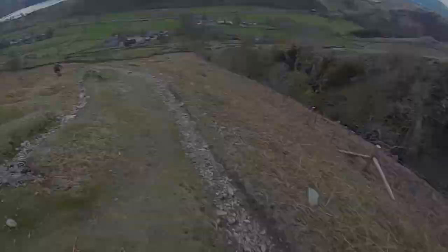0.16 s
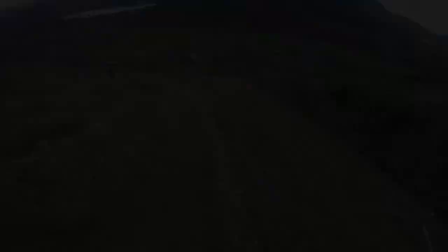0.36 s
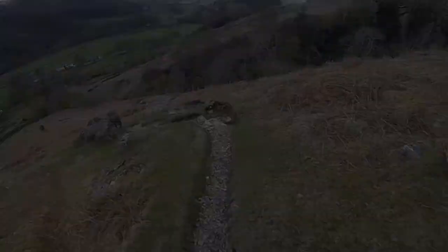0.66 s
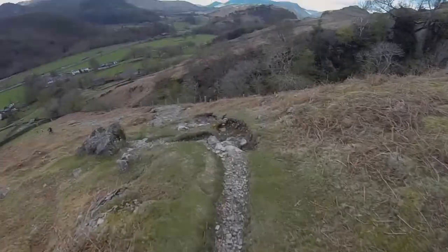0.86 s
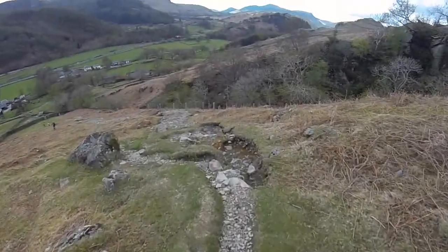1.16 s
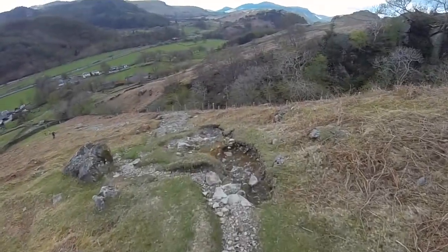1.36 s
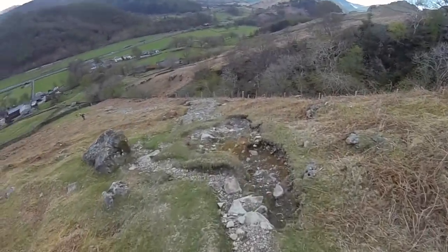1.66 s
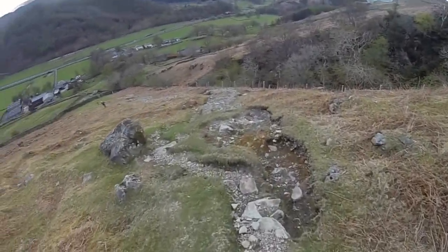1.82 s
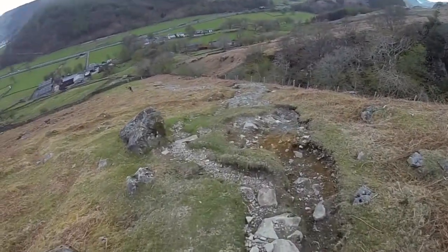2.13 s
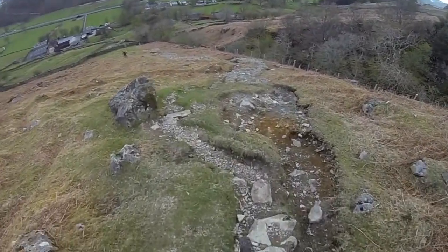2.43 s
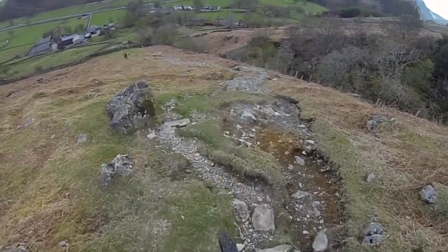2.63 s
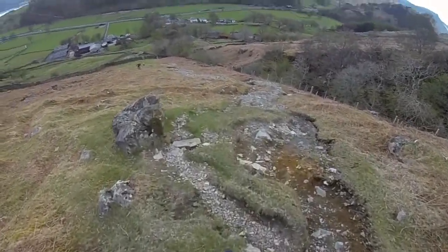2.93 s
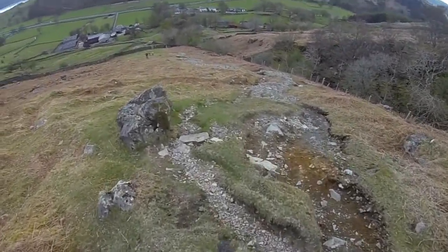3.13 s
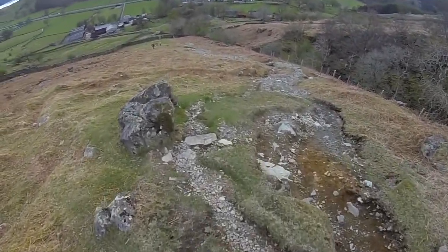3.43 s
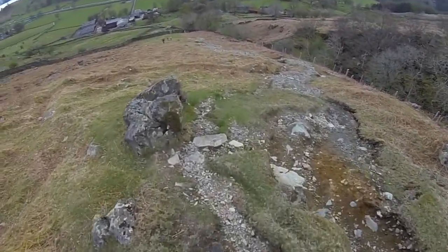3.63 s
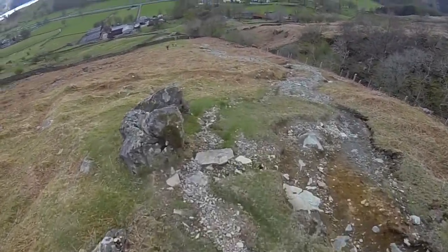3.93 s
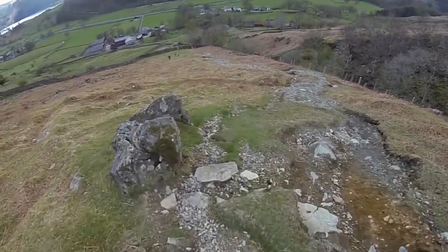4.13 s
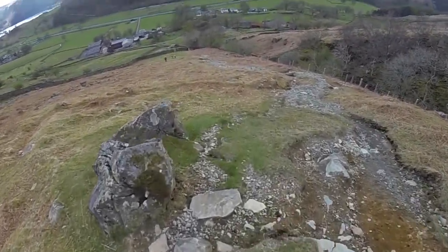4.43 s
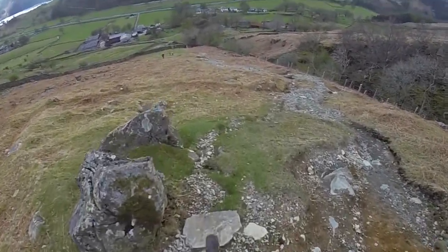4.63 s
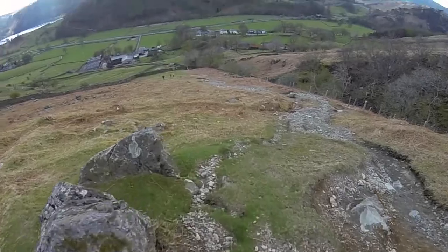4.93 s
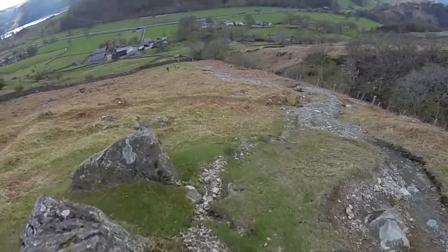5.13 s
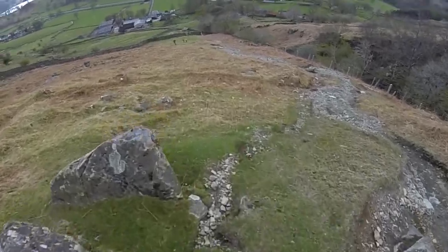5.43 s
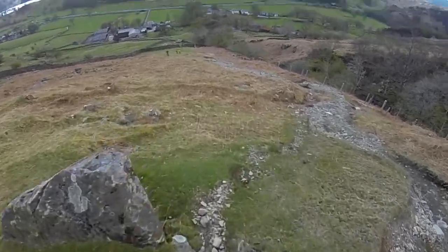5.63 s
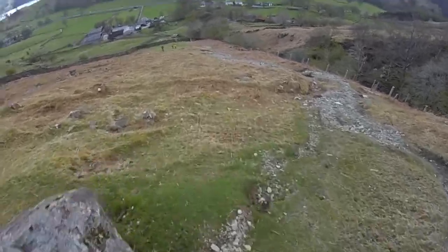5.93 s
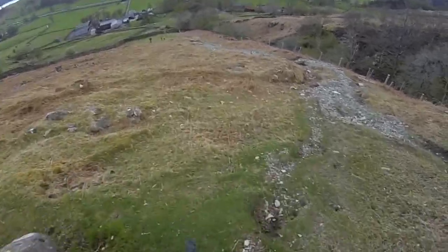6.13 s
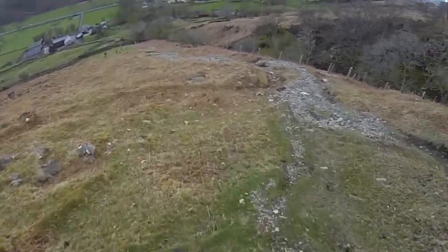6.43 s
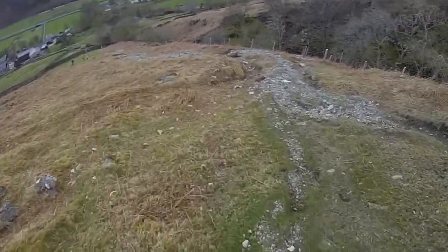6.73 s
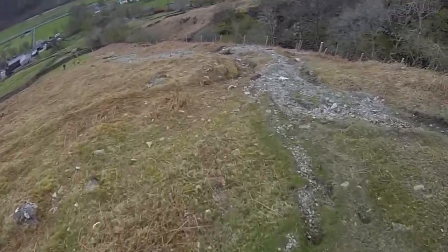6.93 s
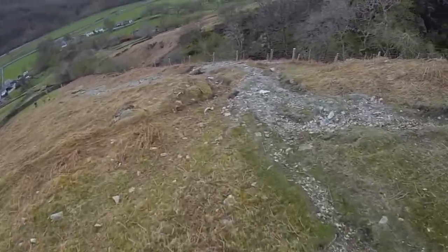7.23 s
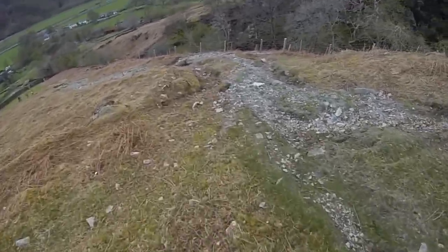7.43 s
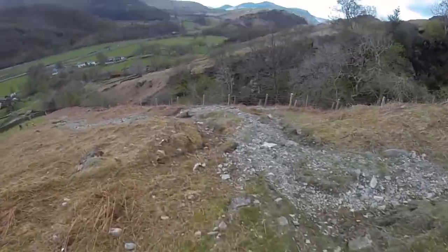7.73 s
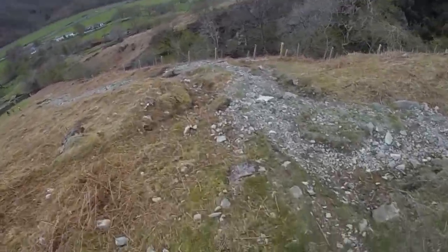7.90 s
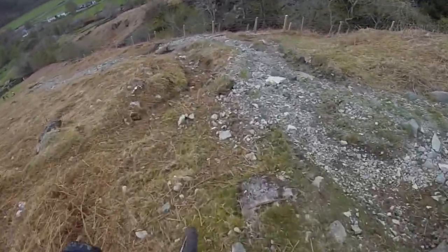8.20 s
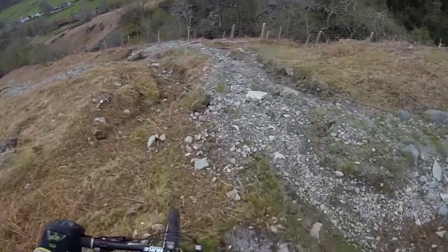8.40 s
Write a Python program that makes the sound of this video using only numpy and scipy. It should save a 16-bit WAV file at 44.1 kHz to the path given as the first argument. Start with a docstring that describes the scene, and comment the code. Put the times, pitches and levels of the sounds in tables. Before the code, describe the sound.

A mountain bike descends a stony hillside, heard through the wall of a sealed plastic camera case: boxy, muffled, bass-heavy, with a faint hiss behind. From 0 to 1 s the brake squeals in quick, wavering, broken bursts, a nasal harmonic tone, over low jolts at 0.1, 0.6 and 0.9 s. A weak squeal follows at 1.2 s. From 1.3 to 4 s the ride is calmer: soft deep rumble, thin grit and scattered dry plastic-like knocks, with a bass swell at 3 s. At 4.1 s a jolt and crunch return; the hardest knock and thud land at 4.9 s. From 5.5 s booming jolts and bursts of crushed gravel come often, with rough little hoots and a short scrape near 6.3 s. Faint squeals recur at 6.1, 7.5, 7.9 and 8.4 s. A huge bass thump and bright crunch hit at 8.05 s, and rumbling continues to the end at 8.5 s.

```python
"""A mountain bike rides down a stony path and shakes a camera in a sealed plastic case. Sway and wind pump the
case in the deep bass, and each jolt rings its springy mount: shaped noise and resonances. Tyre grit is lumpy
noise and tiny clicks, stone knocks are blows with chatter, both heard through the case wall. The brake squeals
in wavering harmonics. Thin squeaks, scrapes, a brief ring of the case after the hardest knock, rough hoots and
a faint hiss lie behind."""
import sys
import numpy as np
from scipy import signal
from scipy.fft import rfft, irfft, next_fast_len
from scipy.io import wavfile
from scipy.ndimage import uniform_filter1d, map_coordinates

SR = 44100
rng = np.random.default_rng(int(sys.argv[2]) if len(sys.argv) > 2 else 0)


def generate_wav(sig):
    """Save sig (samples, or channels by samples) to the path in sys.argv[1] as 16-bit PCM at SR."""
    pcm = np.round(np.clip(np.atleast_2d(sig).T, -1, 1) * 32767).astype(np.int16)
    wavfile.write(sys.argv[1], SR, pcm)


N = 377496  # length in samples


def amp(db):
    """Turn decibels into a plain multiplier."""
    return 10 ** (np.asarray(db) / 20)


def unit(x):
    """Scale a signal to rms 1."""
    return x / np.sqrt(np.mean(x ** 2) + 1e-20)


def along(points, hz):
    """Read a (f/Hz, level/dB) table on a log frequency axis; outside it is almost silent."""
    f, level_db = np.transpose(points)
    return np.interp(np.log(hz + 1), np.log(f + 1), level_db, left=-120, right=-120)


def curves(rows):
    """One value per sample for each column after the time."""
    s, *columns = np.transpose(rows)
    return [np.interp(np.arange(N) / SR, s, column) for column in columns]


def wobble(rate):
    """A smooth random curve through this many random points a second."""
    points = rng.standard_normal(int(N * rate / SR) + 4)
    return map_coordinates(points, [np.arange(N) * rate / SR])


def bell(s, length):
    """A smooth swell and fade around time s; length is the time from the peak down to 1/e."""
    return np.exp(-((np.arange(N) / SR - s) / length) ** 2)


def filtered(x, response):
    """Multiply the spectrum of x by a response, which may be complex."""
    m = next_fast_len(N + SR // 2)
    return irfft(rfft(x, m) * response(np.fft.rfftfreq(m, 1 / SR)), m)[..., :N]


def resonance(f, hz, width):
    """Response of a damped spring: it passes f near hz best, with gain 1 at the peak."""
    return 1j * f * width / (hz ** 2 - f * f + 1j * f * width)


def noise(spectrum):
    """Coloured noise of rms 1."""
    return unit(filtered(rng.standard_normal(N), lambda hz: amp(along(spectrum, hz))))


def cut_above(hz, edge, power):
    """Falling level in dB above the edge."""
    return -10 * np.log10(1 + (hz / edge) ** power)


def cut_below(hz, edge, power):
    """Falling level in dB below the edge."""
    return -10 * np.log10(1 + (edge / (hz + 1)) ** power)


def impulse(db_of, size=4096):
    """The answer to one click with this colour: energy 1, nothing before the click (minimum phase)."""
    cepstrum = irfft(np.log(amp(db_of(np.fft.rfftfreq(size, 1 / SR))) + 1e-6))
    # fold the backward half onto the forward half
    cepstrum[1:size // 2] *= 2
    cepstrum[size // 2 + 1:] = 0
    h = irfft(np.exp(rfft(cepstrum)))[:size // 2]
    return h / np.linalg.norm(h)


def patchy(x, depth_db, bins, frames):
    """Random gain in patches of time and frequency."""
    z = signal.stft(x, nperseg=256)[2]
    field = uniform_filter1d(rng.standard_normal(z.shape), size=bins, axis=0)
    field = uniform_filter1d(field, size=frames, axis=1)
    return signal.istft(z * amp(depth_db * unit(field)), nperseg=256)[1][:N]


# colour of the case's sway and of the wind buffet: f/Hz, level/dB (relative)
SWAY_COLOUR = [(2, -25), (4, -2.5), (20, 6), (35, -9.5), (55, -8.5), (120, -60)]
BUFFET_COLOUR = [(70, -37.5), (120, -0.5), (180, -5), (255, -5), (400, -23.5), (650, -33.5), (1000, -48.5)]
# the trail under the wheels between jolts: t/s, sway level/dB, grit level/dB
TRAIL_LEVELS = [(0, -25.5, -41.5), (.55, -25.5, -45), (.8, -20, -39.5), (1.12, -28.5, -42),
                (1.6, -26.5, -50.5), (1.9, -29, -46.5), (2.35, -32.5, -61), (2.86, -26.5, -48.5),
                (3.15, -35, -60.5), (3.75, -30.5, -55), (3.95, -36.5, -57), (4.15, -24.5, -45.5),
                (4.5, -24.5, -51), (4.85, -25, -42.5), (5.35, -24, -51), (5.65, -25.5, -48),
                (6.2, -21, -37.5), (6.5, -19, -46.5), (7.05, -30, -47), (7.35, -30.5, -43),
                (8.05, -25.5, -48), (8.56, -17.5, -41)]
CALM_SHAKE_DB = -16.5  # the mount's shaking relative to the sway, between jolts
SWAY_T60_S, SHAKE_T60_S = 0.44, 0.52  # time to die away by 60 dB


def shaking():
    """Sway, wind buffet, the ringing mount, and a dull thud of the frame at each jolt."""
    calm_db = curves(TRAIL_LEVELS)[0]
    sway_db = heave(column=2, t60=SWAY_T60_S, calm_db=calm_db)
    shake_db = heave(column=3, t60=SHAKE_T60_S, calm_db=calm_db + CALM_SHAKE_DB)
    sway = amp(sway_db + 3.88 * wobble(3.6)) * noise(SWAY_COLOUR)
    shake = amp(shake_db) * unit(mount(amp(2.5 * wobble(14)) * rng.standard_normal(N)))
    # buffet rises by fewer dB than the sway and shaking
    buffet_db = 0.4 * shake_db + 0.25 * sway_db - 34.0 + 3.8 * wobble(22)
    buffet = amp(buffet_db) * noise(BUFFET_COLOUR)
    blows = np.zeros(N)
    for s, db, *_ in JOLT_LEVELS:
        blows[round(s * SR)] = amp(db)
    # the frame answers each jolt with a dull rattling thud
    t = np.arange(SR // 8) / SR
    fading = amp(-60 * t / 0.084)
    rattle = signal.fftconvolve(blows, fading)[:N] * rng.standard_normal(N)
    thud = filtered(rattle, lambda f: resonance(f, 250, 150) / (1 + 1j * f / 500) ** 2)
    return sway + shake + buffet + amp(48) * mount(blows) + amp(-9) * thud


# wheel jolts: t/s, blow level/dB (before the mount), level/dB of the sway and of the shake that follow
JOLT_LEVELS = [(0.124, -17, -19, -19), (0.557, -17.5, -41, -25), (0.653, -18.5, -25, -30),
               (0.915, -19, -11, -22), (1.51, -18, -21, -50), (3.006, -36, -17, -40.5),
               (4.076, -9.5, -20, -41), (4.614, -19, -23.5, -21.5), (4.925, -2, -25, -18),
               (4.987, -8, -10.5, -24), (5.537, -18.5, -17, -20.5), (5.615, -9.5, -10, -14),
               (5.697, -8, -14.5, -28), (5.868, -26, -29, -21), (6.003, -36, -10, -17.5),
               (6.225, -20, -32, -15.5), (6.37, -9, -25, -34), (6.732, -13, -14, -33),
               (6.892, -14.5, -27, -29.5), (7.155, -12, -16, -23), (7.279, -21, -13.5, -29.5),
               (7.487, -23, -11.5, -55), (7.673, -16, -16.5, -24.5), (7.768, -23, -14, -15),
               (8.037, -1.5, -5.5, -18.5), (8.129, -16.5, -8.5, -19.5), (8.406, -21, -16, -43),
               (8.471, -13, -12.5, -18)]
# the heave peaks LAG after the blow; it is 10 dB lower RISE before its peak
HEAVE_LAG_S, HEAVE_RISE_S = 0.033, 0.053


def heave(column, t60, calm_db):
    """Level in dB: each jolt swells quickly and dies away over the calm level."""
    t = np.arange(N) / SR
    power = amp(2 * calm_db)
    for row in JOLT_LEVELS:
        late = t - row[0] - HEAVE_LAG_S
        drop_db = np.where(late < 0, 10 * (late / HEAVE_RISE_S) ** 2, 60 * late / t60)
        power = power + amp(2 * (row[column] - drop_db).clip(-120))
    return 10 * np.log10(power)


MOUNT_HZ, MOUNT_WIDTH_HZ = 74, 12.5


def mount(x):
    """The springy mount: a resonance, and two stages that stop following fast shaking."""
    def response(f):
        follow = 90 ** 2 / (90 ** 2 - f * f + 1j * f * 70)
        return resonance(f, MOUNT_HZ, MOUNT_WIDTH_HZ) * follow ** 2
    return filtered(x, response)


# the tyre crushes a heap of stones: t/s, length/s, grit boost level/dB
CRUNCH_TIMES = [(4.098, 0.022, 9.5), (4.207, 0.021, 5), (4.96, 0.014, 9), (5.039, 0.024, 6.5),
                (5.608, 0.094, 8), (5.811, 0.024, 9), (5.888, 0.033, 9.5), (6.109, 0.013, 6),
                (6.347, 0.01, 9.5), (6.761, 0.031, 8.5), (7.196, 0.057, 11.5), (7.289, 0.021, 4.5),
                (7.433, 0.009, 6.5), (7.726, 0.045, 9.5), (8.051, 0.018, 6.5), (8.095, 0.033, 13.5),
                (8.144, 0.012, 8.5)]
# what the case wall lets through: f/Hz, level/dB (relative)
CASE_WALL = [(400, -29), (620, -23.5), (833, -9.5), (960, -17), (1140, -16), (1380, 2.5), (1520, 3.5),
             (1790, -10), (2670, -20), (3130, -15.5), (4180, -31.5), (5200, -40), (5900, -36.5),
             (7000, -55.5), (7900, -46.5), (11000, -74), (15600, -68.5)]


def grit():
    """Tyres on gravel: a lumpy rush with clumps of small stones in it, all through the case wall."""
    grit_db = curves(TRAIL_LEVELS)[1]
    draw = rng.random((3, N))
    crush_db = sum(db * bell(s, length) for s, length, db in CRUNCH_TIMES)
    clumps = amp(1.8 * wobble(25) + 1.9 * crush_db)
    size = amp(np.minimum(-4.5 * np.log(draw[1] + 1e-9), 9)) * np.sign(draw[2] - .5)
    hits = draw[0] < 350 * clumps / SR  # about 350 a second, times the clumps
    stones = np.diff(hits * size, prepend=0)  # hard contacts are bright
    rush = amp(1.8 * wobble(35)) * rng.standard_normal(N)
    wall = impulse(lambda hz: along(CASE_WALL, hz))
    # every crunch has its own colour
    crunch = unit(signal.fftconvolve(patchy(rush, 3.3, bins=5, frames=7), wall)[:N])
    rattle = unit(signal.fftconvolve(patchy(stones, 5.7, bins=8, frames=3), wall)[:N])
    mix = unit(crunch + 0.3 * rattle)
    # crushed stones are brighter than rolled ones
    bite = filtered(crunch, lambda hz: np.exp(-((hz - 5300) / 1200) ** 2))
    return amp(grit_db + crush_db) * (mix + (amp(0.12 * crush_db) - 1) * bite)


# stone and mount knocks: t/s, strength level/dB, brightness level/dB (both rescaled for each part)
KNOCK_TIMES = [(0.013, -31.5, -14), (0.023, -33, -15), (0.0892, -33, -3), (0.118, -24, -4),
               (0.1512, -22.5, -16), (0.204, -34, -6), (0.217, -25.5, -12), (0.256, -37.5, 1),
               (0.2725, -23, -15), (0.304, -33, -18.5), (0.395, -25, -15), (0.548, -30, -20),
               (0.592, -37.5, -3), (0.652, -33.5, -10), (0.972, -28.5, 0.5), (1.3261, -22.5, -7),
               (1.372, -25.5, -12), (1.49, -29.5, -14), (1.611, -32.5, -15), (1.654, -29.5, -13),
               (1.7334, -32, -5.5), (1.7903, -25, -26), (1.8544, -32, -13), (1.896, -33.5, -8),
               (2.0703, -30.5, -8), (2.141, -26.5, -13), (2.249, -34.5, -4), (2.2581, -22.5, -3.5),
               (2.431, -29, -15), (2.4456, -25, -11), (2.6348, -22, -11.5), (2.681, -45, 2),
               (2.7062, -31, -7), (2.7643, -22, -20), (2.825, -35, -5), (2.834, -23.5, -22),
               (2.863, -37, -1.5), (2.892, -34, -2.5), (2.907, -30, -4.5), (2.973, -37, -22),
               (3.052, -34.5, -10), (3.146, -24, -15.5), (3.346, -25.5, -10), (3.507, -30.5, -3.5),
               (3.625, -37.5, -3.5), (3.8642, -33.5, -0.5), (4.0837, -32, -14), (4.176, -38, -6),
               (4.1933, -32.5, -27), (4.2586, -36.5, -6), (4.373, -35, -8), (4.4918, -41, -3),
               (4.568, -31, -10), (4.727, -24, -6), (4.8, -27, -31), (4.901, -29, -5.5), (4.929, -9.5, -25),
               (5.0165, -45, 7), (5.089, -42, 1), (5.495, -44.5, 7), (5.582, -25, -7.5),
               (5.704, -37.5, 0.5), (5.8694, -32, -6), (5.997, -39, -1), (6.218, -19, -7.5),
               (6.443, -27.5, -18), (6.454, -29.5, -6), (6.716, -25.5, -45), (6.873, -28.5, -17),
               (6.9709, -23.5, -3), (7.0632, -27.5, -13), (7.3581, -31, -7.5), (7.425, -32.5, -5),
               (7.8026, -27.5, -13), (7.9226, -29, -12), (8.097, -17.5, -5.5), (8.197, -38.5, -4),
               (8.2832, -33, -4.5), (8.502, -21, -7.5)]


def knocks():
    """Each knock is a blow and brief chatter; low, middle and bright parts of the wall answer apart."""
    t = np.arange(SR // 20) / SR
    dull, mid, bright, panel = np.zeros((4, N + len(t)))
    strength_db = np.transpose(KNOCK_TIMES)[1][:, None]
    t60 = 0.022 * amp(0.15 * (strength_db + 29.0))  # hard blows chatter longer
    bursts = 0.055 * rng.standard_normal((len(KNOCK_TIMES), len(t))) * amp(-60 * t / t60)
    bursts[:, 0] = 1  # the blow itself
    for (s, db, bright_db), burst in zip(KNOCK_TIMES, bursts):
        here = slice(round(s * SR), round(s * SR) + len(t))
        dull[here] += amp(0.77 * db + 7.5) * burst
        mid[here] += amp(db + 0.25 * bright_db + 7.5) * burst
        # the treble is mostly chatter
        bright[here] += amp(db + bright_db + 17.5) * np.clip(burst, -0.3, 0.3)
        # the wall itself swings up, slower and lower after hard blows
        u = t / (0.0024 * amp(0.29 * db))
        swing = 2 * np.pi * min(1250.5 - 15 * db, 1680) * t
        modes = np.sin(swing) - 0.47 * np.cos(rng.normal(0.873, 0.05) * swing)  # two modes beat
        panel[here] += amp(1.838 * db + 25.5) * u * np.exp(-u) * modes

    def low_db(hz):
        bump = 7 * np.exp(-((hz - 1900) / 300) ** 2)
        return along(CASE_WALL, hz) + bump + cut_above(hz, 2400, 8) + cut_below(hz, 1100, 4)

    def middle_db(hz):
        return along(CASE_WALL, hz) + cut_below(hz, 2700, 12) + cut_above(hz, 3800, 6)

    def high_db(hz):
        return 1.186 * along(CASE_WALL, hz) + cut_below(hz, 4200, 10)

    parts = [(dull, low_db), (mid, middle_db), (bright, high_db)]
    answers = sum(signal.fftconvolve(blows, impulse(db_of)) for blows, db_of in parts)
    return panel[:N] + answers[:N]


# the brake pads grip: t/s, hold/s, grip level/dB (before the overtone levels)
PAD_GRIPS = [(0, 0.028, -33), (0.052, 0.082, -30.5), (0.153, 0.039, -31.5), (0.212, 0.07, -31),
             (0.277, 0.016, -26), (0.329, 0.019, -20), (0.384, 0.018, -29.5), (0.43, 0.095, -30),
             (0.634, 0.014, -28), (0.669, 0.074, -31), (0.758, 0.025, -24), (0.792, 0.035, -29),
             (0.839, 0.04, -21.5), (0.888, 0.018, -28.5), (0.911, 0.0094, -23.5), (0.943, 0.022, -29),
             (0.972, 0.043, -35.5), (1.235, 0.045, -34.5), (6.105, 0.075, -35), (7.497, 0.088, -35),
             (7.898, 0.041, -34.5), (8.418, 0.058, -29.5)]
# overtones of the squeal: multiple of the pitch, level/dB, how far it follows the single grip
SQUEAL_OVERTONES = [(1, -23, 0.36), (2, 1.5, 1.18), (3, -24.5, 0.65), (4, -31.5, 0.5), (5, -41.5, 0.7)]
# middle pitch of the squeal: t/s, f/Hz
SQUEAL_HZ = [(0.06, 785), (0.33, 768), (0.63, 775), (0.8, 796), (1.2, 790), (6.1, 780), (8.4, 786)]
BITE_DB_PER_S, LET_GO_DB_PER_S = 804.5, 601.5  # how steeply a grip rises and falls
FIRM_DB, FLUTTER = -24.5, 0.59  # a grip weaker than this flutters, a firmer one sings cleanly


def brake():
    """Pads stick and slip on the rotor: a harmonic tone, clean when firm and fluttering when light."""
    t = np.arange(N) / SR
    grips = [db - BITE_DB_PER_S * (s - t).clip(0) - LET_GO_DB_PER_S * (t - s - hold).clip(0)
             for s, hold, db in PAD_GRIPS]
    grip_db = np.max(grips, axis=0)
    slow_db = 20 * np.log10(np.abs(uniform_filter1d(amp(grip_db), size=SR // 16)) + 1e-9)
    loose = FLUTTER / (1 + amp(grip_db - FIRM_DB) ** 2)
    waver = 1 + 0.00498 * wobble(25) + 0.00784 * wobble(160)
    phase = 2 * np.pi * np.cumsum(curves(SQUEAL_HZ)[0] * waver) / SR
    squeal = np.zeros(N)
    for k, db, share in SQUEAL_OVERTONES:
        # each overtone chatters on its own, and mixes the single grip with the mean pressure
        level = amp(share * grip_db + (1 - share) * slow_db)
        chatter = amp(db + 2 * (k - 2) * wobble(14))
        flutter = 1 + loose * wobble(150)
        jitter = (0.32 * (k - 1) + 1.2 * loose) * wobble(70)
        squeal += chatter * level * flutter * np.sin(k * phase + jitter)
    return squeal


# thin squeaks: t/s, length/s, f/Hz, level/dB
SQUEAK_TIMES = [(2.707, 0.017, 12100, -61), (5.107, 0.016, 12160, -58)]


def squeaks():
    """Brief thin whistles with unsteady pitch and level, probably from the brake rotor."""
    t = np.arange(N) / SR
    total = np.zeros(N)
    for s, length, hz, db in SQUEAK_TIMES:
        whistle = np.sin(2 * np.pi * hz * t + 1.3 * wobble(110))
        total += amp(db) * bell(s, length) * whistle * (1 + 0.76 * wobble(90))
    return total


# hoarse narrow scrapes, and at 4.95 s the case ringing after the hard knock: t/s, length/s, f/Hz, level/dB
SWELL_TIMES = [(1.14, 0.057, 3400, -52), (4.95, 0.0057, 1430, -29), (5.875, 0.011, 3060, -47),
               (6.285, 0.074, 2900, -46.5)]
SCRAPE_WIDTH_HZ = 320  # of each of two equal resonances in a row


def scrapes_and_ring():
    """Short swells of noise, each in its own narrow band: hoarse scrapes, and the case ringing on after the
    hard knock."""
    total = np.zeros(N)
    for s, length, hz, db in SWELL_TIMES:
        band = filtered(rng.standard_normal(N), lambda f: resonance(f, hz, SCRAPE_WIDTH_HZ) ** 2)
        total += amp(db) * bell(s, length) * unit(band)
    return total


# a rough hoot comes and goes with the crunching, probably the frame: t/s, length/s, level/dB
HOOT_TIMES = [(1.012, 0.039, -53), (4.093, 0.011, -50), (4.204, 0.017, -49), (4.93, 0.017, -42),
              (5.04, 0.067, -53), (6.051, 0.038, -47.5), (7.278, 0.057, -45.5), (7.503, 0.056, -54),
              (7.687, 0.011, -43), (7.807, 0.029, -47), (8.1, 0.045, -54), (8.41, 0.056, -52.5)]
HOOT_HZ, HOOT_WIDTH_HZ = 840, 74  # of each of two equal resonances in a row


def hoots():
    """Noise in one narrow resonant band, swelling and fading."""
    swell = sum(amp(db) * bell(s, length) for s, length, db in HOOT_TIMES)
    band = filtered(rng.standard_normal(N), lambda f: resonance(f, HOOT_HZ, HOOT_WIDTH_HZ) ** 2)
    return swell * unit(band)


# colour of the background hiss: f/Hz, level/dB (relative)
HISS_COLOUR = [(300, 19.5), (3000, 7.5), (7500, -1), (9500, -4), (12000, -5.5), (13200, -15.5),
               (14400, -6.5), (15600, -21.5)]


def hiss():
    """Faint coloured noise whose level wavers a little."""
    return amp(-64.5 + 2.37 * wobble(35)) * noise(HISS_COLOUR)


def scene():
    """All layers added up, as one channel."""
    ride = shaking() + grit() + knocks()
    return (ride + brake() + squeaks() + scrapes_and_ring() + hoots() + hiss())[None]


TOP_HZ = 15700  # nothing is kept from here up


def record(dry):
    """Soft clipping at full scale, then the band limit."""
    held = dry / (1 + np.abs(dry) ** 8) ** (1 / 8)
    return filtered(held, lambda hz: hz < TOP_HZ)


dry = scene()
out = record(dry)
generate_wav(out)
```